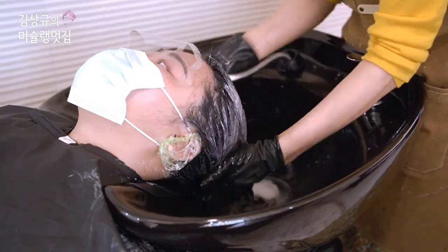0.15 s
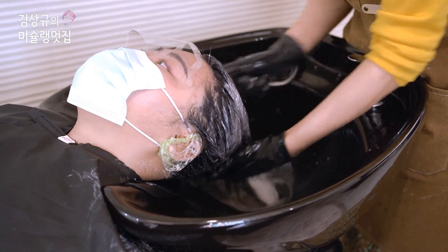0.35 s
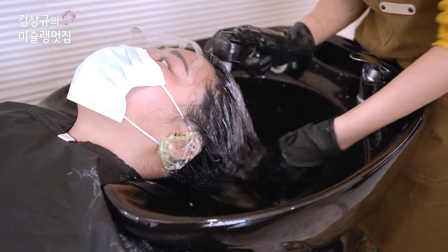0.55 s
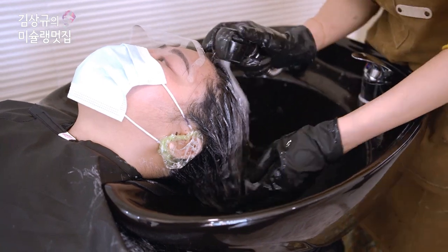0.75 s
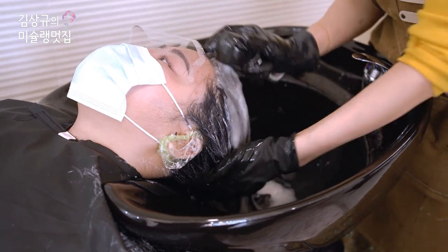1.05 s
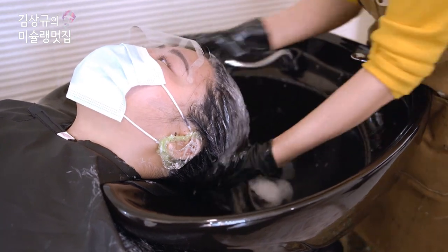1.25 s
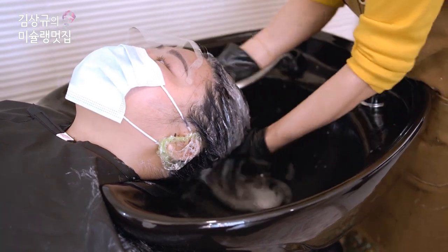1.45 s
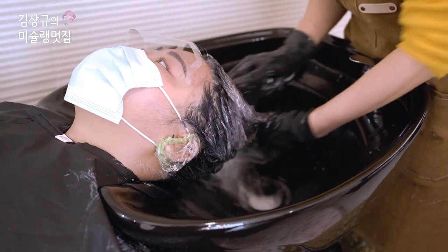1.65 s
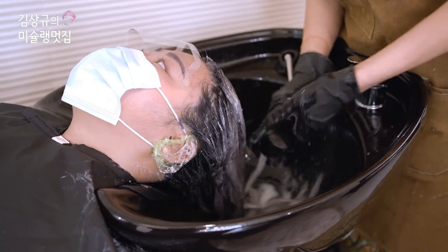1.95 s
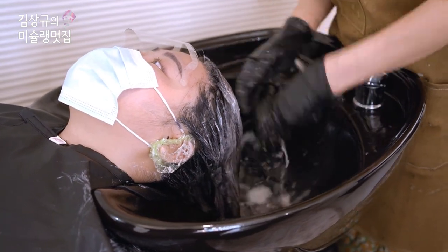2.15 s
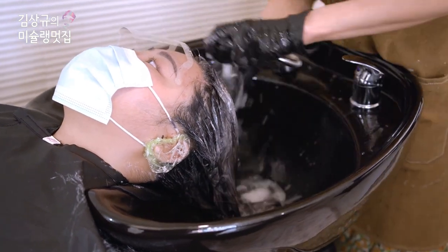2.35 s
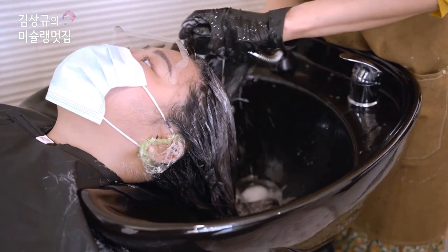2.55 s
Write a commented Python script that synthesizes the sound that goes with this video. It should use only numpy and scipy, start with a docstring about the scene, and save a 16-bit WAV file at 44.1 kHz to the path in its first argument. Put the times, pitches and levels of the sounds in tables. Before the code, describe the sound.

Water sprays steadily onto wet hair, spattering and sloshing into a salon basin.

```python
"""At a salon basin, a hand shower rinses hair. Fine drops hiss on the hair, and coarser ones spatter
when the jet sweeps over glove and basin. Pockets between the cupped hand and the wet hair squelch as
they fill and open. Shed water slaps into the bowl, which rings faintly, and air gulps in the drain."""
import sys
import numpy as np
from scipy import signal
from scipy.fft import rfft, irfft
from scipy.io import wavfile
from scipy.ndimage import uniform_filter1d

SR = 44100
rng = np.random.default_rng(int(sys.argv[2]) if len(sys.argv) > 2 else 0)


def digitize_waveform(pressure):
    """Quantize a signal to 16-bit integers and store it at the path in sys.argv[1].

    Rows of a 2-D input are taken as channels; values are limited to [-1, 1].
    """
    field = np.atleast_2d(pressure).T
    bounded = np.clip(field, -1, 1)
    quanta = np.round(bounded * 32767).astype(np.int16)
    wavfile.write(sys.argv[1], SR, quanta)


N = 119070
T = np.arange(N) / SR
HZ = np.maximum(np.arange(N // 2 + 1) * SR / N, 1)


def from_db(db):
    """Turn decibels into a number to multiply by."""
    return 10 ** (np.asarray(db) / 20)


def unit_power(x):
    """Scale a sound to an average power of 1."""
    return x / np.sqrt(np.mean(x ** 2) + 1e-20)


def at_hz(points):
    """Read a table of (Hz, value) at every frequency."""
    hz, value = np.transpose(points)
    return np.interp(np.log(HZ), np.log(hz), value)


def in_time(points):
    """Read a table of (seconds, value) at every sample."""
    return np.interp(T, *np.transpose(points))


def filtered(x, gain):
    """Turn each frequency up or down by its own gain."""
    return irfft(rfft(x) * gain, N)


def low_cut_db(hz):
    """Fade out the tones below hz: small things give off little bass."""
    return -10 * np.log10(1 + (hz / HZ) ** 6)


def delayed(x, ms):
    """Delay both sides by a time that may keep changing."""
    return np.array([np.interp(T - ms / 1000, T, side) for side in x])


def drift(hz):
    """A random wobble of about size 1, mostly slower than hz."""
    return unit_power(filtered(rng.standard_normal(N), 1 / (1 + (HZ / hz) ** 2)))


def swell(peak_s, rise_s, fall_s):
    """A rounded rise to 1, then a fading tail."""
    rise = np.minimum(T - peak_s, 0) / rise_s
    fall = np.clip((T - peak_s) / fall_s, 0, 40)
    return np.exp(-rise ** 2 - fall)


def ring(clicks, hz, fade_s):
    """Each click starts a tone that fades by 60 dB in fade_s."""
    decay, angle = from_db(-60 / (fade_s * SR)), 2 * np.pi * hz / SR
    feedback = [1, -2 * decay * np.cos(angle), decay ** 2]
    return signal.lfilter([0, decay * np.sin(angle)], feedback, clicks + 1e-18)


def drops(per_s, spread_db):
    """Three streams of random clicks of uneven size: one shared, one for each side."""
    sizes = from_db(spread_db * np.minimum(rng.exponential(1, (3, N)), 5))
    signs = rng.choice([-1, 1], (3, N))
    return unit_power(sizes * signs * (rng.random((3, N)) < per_s / SR))


# How alike the two sides sound. Each row: frequency in Hz, likeness (1 or more means the same).
LIKENESS = [(150, 1.23), (500, 0.73), (1400, 0.73), (2800, 0.43), (5600, 0.34), (12000, 0.14)]

def stereo(streams, colour_db=0):
    """Colour three streams and mix them to left and right, alike in the bass but not in the treble."""
    alike, gain = np.clip(at_hz(LIKENESS), 0, 1), from_db(colour_db)
    shared = filtered(streams[0], gain * np.sqrt(alike))
    sides = filtered(streams[1:], gain * np.sqrt(1 - alike))
    return unit_power(shared + sides)


# The flow down the bowl. Each row: time in seconds, level in dB.
RUNOFF_LEVEL = [(0, -57), (.15, -56), (.24, -61), (.45, -61), (.7, -58.5), (.93, -63), (1.08, -58),
                (1.26, -54), (1.34, -54), (1.55, -59.5), (1.85, -58.5), (1.94, -62), (2.05, -54),
                (2.2, -64), (2.7, -56.5)]
# Its tone colour. Each row: frequency in Hz, level in dB.
RUNOFF_COLOUR = [(30, -50), (65, -32), (105, -17), (160, -2.5), (250, 1.5), (315, 4), (390, -1), (600, 4),
                 (1000, -3), (2500, -10.5), (8000, -12.5), (16000, -40)]

def runoff():
    """Water runs down the bowl with a low, uneven trickle."""
    level = from_db(in_time(RUNOFF_LEVEL) + 1.05 * drift(36))
    return level * stereo(drops(per_s=2000, spread_db=2.6), at_hz(RUNOFF_COLOUR))


# The tones in one smack. Each row: multiple of its pitch, level in dB.
SMACK_TONES = [(.66, -4), (1, -2), (1.33, 0)]

def smack(hz, cycles):
    """Water lands with a short, dead ring: small drops sound high, large lumps low."""
    click = signal.unit_impulse(SR // 20)
    tones = sum(from_db(db) * ring(click, ratio * hz, cycles / hz) for ratio, db in SMACK_TONES)
    band = signal.butter(2, [hz / 2, hz * 1.4], "band", fs=SR, output="sos")
    hit = signal.sosfilt(band, tones)
    return hit / np.abs(hit).max()


# Water landing. Each row: start in seconds, level in dB, pitch in Hz, length of the ring in cycles.
SLAPS = [(.030, -35, 2400, 10), (.0885, -28, 2200, 14), (.2864, -23, 7400, 20), (.2918, -20, 7800, 26),
         (.7278, -28, 1800, 16), (1.1818, -27, 8000, 14), (1.9482, -20, 3100, 12),
         (1.9522, -11.5, 2900, 18), (1.9572, -20, 4600, 10), (1.9581, -16, 2900, 12),
         (1.9605, -11, 3300, 15), (2.2848, -20, 5700, 20), (2.2978, -17, 6000, 26), (2.309, -18, 3400, 16),
         (2.3124, -17, 4400, 22), (2.321, -18, 4000, 18), (2.4935, -24, 3500, 16)]

def slaps(echo_db=-7.5, echo_fade_s=0.17):
    """Lumps of water and heavy drops smack down, and the sound scatters round the bowl."""
    hits = np.zeros(N + SR)
    for start_s, db, hz, cycles in SLAPS:
        hit, at = from_db(db) * smack(hz, cycles), int(start_s * SR)
        hits[at:at + len(hit)] += hit
    scatter = rng.standard_normal((2, N)) * from_db(-60 * np.minimum(T / echo_fade_s, 3))
    scatter /= np.linalg.norm(scatter, axis=1, keepdims=True)
    echo = signal.fftconvolve(hits[None, :N], scatter)[:, :N]
    return hits[:N] + from_db(echo_db) * echo


# The spray, which dips while the hand covers it. Each row: time in seconds, level in dB.
SPRAY_LEVEL = [(.07, -36.5), (.17, -35.5), (.33, -35.5), (.52, -37.5), (.75, -34.5), (.95, -35.5),
               (1.03, -35), (1.22, -34), (1.38, -37.5), (1.47, -42.5), (1.51, -47), (1.548, -47),
               (1.575, -37), (1.72, -36), (1.85, -36.5), (2.15, -35), (2.44, -36), (2.7, -37)]
# Its tone colour. Each row: frequency in Hz, level in dB.
SPRAY_COLOUR = [(250, -55), (450, -19), (750, -16), (1000, -10), (1330, -6), (1680, -1.5), (2300, -1),
                (3100, -2), (4000, -1), (5500, -2.5), (8000, -2), (10000, -5), (12500, -6.5), (15500, -9)]
# How its treble dulls and returns. Each row: time in seconds, change in dB.
SPRAY_TREBLE = [(.1, 0), (.7, -1.5), (1.05, -4), (1.33, -3.5), (1.5, -2), (1.62, -5.5), (1.9, 0),
                (2.2, -1.5), (2.7, -1.5)]

def spray(start_s=0.066, attack_s=0.0024, mist_db=5.5, flutter_db=0.97, bubble_db=-22.5, tick_db=-12):
    """Fine drops and smooth mist hiss on the hair; bubbles and ticks rise and sink with them."""
    grains = drops(per_s=5000, spread_db=3) + from_db(mist_db) * rng.standard_normal((3, N))
    hiss = stereo(grains, at_hz(SPRAY_COLOUR) + low_cut_db(660))
    treble = filtered(hiss, from_db(low_cut_db(6300)))
    hiss += (from_db(in_time(SPRAY_TREBLE)) - 1) * treble
    opening = np.clip((T - start_s) / attack_s, 0, 1)
    level = opening * from_db(in_time(SPRAY_LEVEL) + flutter_db * drift(40))
    return level * (hiss + from_db(bubble_db) * bubbles() + from_db(tick_db) * ticks())


def bubbles(pitches=48, cycles=21):
    """Small bubbles ring briefly in the wet hair."""
    clicks, choice = drops(per_s=290, spread_db=3.5), rng.integers(0, pitches, N)
    rings = sum(np.sqrt(hz) * ring(clicks * (choice == k), hz, cycles / hz)
                for k, hz in enumerate(np.geomspace(1450, 7000, pitches)))
    return stereo(rings, low_cut_db(630))


def ticks(pitches=10, cycles=14):
    """Stray droplets tick on the glaze, each at a pitch picked by chance."""
    clicks, choice = drops(per_s=70, spread_db=2), rng.integers(0, pitches, N)
    rings = sum(signal.fftconvolve(clicks * (choice == k), smack(hz, cycles)[None])[:, :N]
                for k, hz in enumerate(np.geomspace(4000, 11000, pitches)))
    return stereo(rings)


# Close echoes off bowl and hands. Each row: delay in milliseconds, level in dB.
REFLECTIONS = [(1.3, -18.5), (2.1, -19.5), (3.2, -16), (4.4, -27), (5.9, -11.5), (7.7, -11), (10.3, -13)]

def reflections(x, wander_ms=0.25, wander_hz=1.3):
    """Echo paths wander as the sprayer moves, giving the hiss a shifting, hollow colour."""
    echoes = sum(from_db(db) * delayed(x, ms + wander_ms * drift(wander_hz)) for ms, db in REFLECTIONS)
    return (x + echoes) / np.sqrt(1 + sum(from_db(db) ** 2 for _, db in REFLECTIONS))


# The basin's own tones. Each row: pitch in Hz, relative level in dB.
BOWL_TONES = [(973, -5), (1421, -2), (1653, -8), (1815, -9), (1941, -5), (2200, -2), (2414, -6), (2556, -6),
              (2795, -6), (2922, -6), (3304, -5), (4187, -6), (6009, -7), (9626, -4)]

def bowl(x, width_hz=22, ring_db=-3):
    """The hollow of the basin rings along, lifting a few narrow tones."""
    rings = sum(from_db(db) / (1 + 2j * (HZ - hz) / width_hz) for hz, db in BOWL_TONES)
    return filtered(x, 1 + from_db(ring_db) * rings)


def churn():
    """The jet stirs trapped water into a dense crackle."""
    return stereo(drops(per_s=4100, spread_db=4))


# Water pockets under the hand. Each row: peak time, rise and fall in seconds, level in dB,
# pitch in Hz, glide in octaves per second, width in octaves, left minus right in dB.
SQUELCHES = [(.09, .006, 0.023, -39, 1800, -12, 0.54, -1), (.24, 0.041, 0.048, -32.5, 2080, -4, .7, 2),
             (.732, 0.0054, 0.017, -43.5, 1410, 2, 1.7, 0), (1.245, 0.0081, 0.027, -38, 1940, 26, 0.48, 1),
             (1.283, 0.0033, 0.029, -47, 560, -8, 0.73, -4), (1.465, .008, 0.048, -52.5, 1200, -6, 1.7, -2),
             (1.6, .028, 0.088, -39.5, 1213, 4.5, 0.32, 1.5),
             (1.614, 0.035, 0.029, -41, 1940, -11, 0.33, -2.5),
             (1.685, 0.062, 0.09, -38, 2100, 6.5, 0.68, 0), (1.675, 0.027, 0.048, -42, 8100, 1, 0.081, -1),
             (1.894, 0.019, 0.012, -39, 1730, -3, 0.93, 1), (1.965, 0.018, 0.06, -48, 720, 13, .34, -2),
             (2.224, .007, .018, -35.5, 2255, 2, .22, 0), (2.24, .013, .016, -33.5, 3200, 4, .55, -1.5),
             (2.258, .003, .007, -30.5, 4200, 20, .55, 0), (2.41, 0.053, 0.028, -43.5, 1700, 0, 0.31, -1)]

def squelches(bands=24):
    """The jet churns in pockets, each with a broad pitch that glides as it changes size."""
    spectrum = rfft(churn())
    edges, times = np.geomspace(340, 10000, bands + 1), T[::32]
    centres = np.sqrt(edges[1:] * edges[:-1])[:, None]
    power = np.zeros((2, bands, len(times)))
    # Share each pocket's power among the frequency bands near its pitch.
    for peak_s, rise_s, fall_s, db, hz, glide, width, pan_db in SQUELCHES:
        octaves_away = np.log2(centres / hz) - glide * np.clip(times - peak_s, -rise_s * 2, fall_s * 2)
        share = 1 / (1 + (octaves_away / width) ** 4) ** 3
        level = from_db(db) * np.interp(times, T, swell(peak_s, rise_s, fall_s))
        pan = from_db([pan_db, -pan_db])[:, None, None]
        power += pan * share / share.sum(axis=0) * level ** 2
    out = 0
    for k in range(bands):
        band = unit_power(irfft(spectrum * ((HZ >= edges[k]) & (HZ < edges[k + 1])), N))
        out += band * np.sqrt([np.interp(T, times, side) for side in power[:, k]])
    return out


# The gap between hand and hair. Each row: time in seconds, the sound's round trip in milliseconds.
GAP_TRIP = [(.18, 0.56), (.195, 0.8), (.21, 0.78), (.3, 1.16), (1.6, 1.01), (1.75, 0.43), (2.7, 0.42)]

def hand_gap(x, bounce_gain=0.28):
    """Sound bounces between hand and hair; its colour sinks as the gap opens and rises as it closes."""
    return sum(bounce_gain ** k * delayed(x, k * in_time(GAP_TRIP)) for k in range(3))


# The cupped hand floods and opens. Each row: time in seconds, level in dB, lowest tone in Hz,
# upper limit in Hz above which tones fade.
SURGES = [(.176, -48, 3100, 4800), (.186, -32, 2300, 4400), (.195, -27, 1330, 4400),
          (.208, -23.5, 1060, 4600), (.216, -26, 1020, 3100), (.224, -21.5, 980, 2900),
          (.228, -30, 960, 2800), (.231, -22, 950, 2800), (.239, -18.5, 980, 2300), (.243, -26, 960, 2600),
          (.251, -23, 970, 2700), (.26, -33, 960, 2700), (.272, -32, 950, 2500), (.29, -48, 950, 2500)]
# The tones of that hollow. Each row: multiple of the lowest tone, level in dB.
HAND_TONES = [(1, -7), (1.58, -.5), (2.05, 2), (2.6, .5), (3.05, -1), (3.95, 1)]

def cupped_hand(width_hz=240):
    """The jet floods the cupped hand in surges; the hollow's tones plunge together as it opens."""
    water, tones = churn(), 0
    db, lowest_hz, top_hz = (in_time([(row[0], row[k]) for row in SURGES]) for k in (1, 2, 3))
    decay = np.exp(-np.pi * width_hz / SR)
    for ratio, tone_db in HAND_TONES:
        hz = ratio * lowest_hz
        # A gliding filter: shift this pitch down to 0 Hz, smooth, then shift it back.
        shift = np.exp(2j * np.pi * np.cumsum(hz) / SR)
        tone = signal.lfilter([(1 - decay) ** 2], [1, -2 * decay, decay ** 2], water / shift) * shift
        tones += from_db(tone_db) / np.sqrt(1 + (hz / top_hz) ** 14) * tone.real
    power = uniform_filter1d(np.mean(tones ** 2, axis=0), size=300)
    steady = tones / np.sqrt(power + 1e-20)
    flooding = (T > SURGES[0][0]) * (T < SURGES[-1][0])
    return filtered(from_db(db) * flooding * steady, from_db(2 * low_cut_db(930)))


# The jet sweeps over glove and basin. Each row: peak time, rise and fall in seconds, level in dB,
# brightness in dB per octave.
SWEEPS = [(.292, 0.0073, 0.016, -34.5, 19), (0.984, 0.022, 0.14, -34, 5.5), (1.186, 0.0078, 0.009, -38, 12),
          (1.366, 0.0095, 0.039, -38.5, 2.5), (1.412, 0.0094, 0.031, -37, 11),
          (1.892, 0.018, 0.012, -37, 0), (1.973, 0.021, 0.027, -26.5, -0.5), (1.999, 0.02, 0.012, -27, 19),
          (2.025, 0.021, 0.031, -27.5, 5), (2.051, 0.009, 0.042, -29.5, 8.5),
          (2.205, .038, 0.091, -34, 7.5), (2.295, 0.0097, .02, -29.5, 6.5), (2.318, 0.018, 0.1, -29, 5.5),
          (2.492, 0.0083, 0.09, -34, 5)]
# The spatter's tone colour. Each row: frequency in Hz, level in dB.
SPATTER_COLOUR = [(290, -67), (500, -35), (569, -28), (783, -28), (866, -30), (1940, 2), (4300, 5),
                  (8370, -2.5), (15800, -15.5)]

def spatters():
    """Coarser drops hit hard, wet surfaces, each sweep with its own brightness."""
    patter = stereo(drops(per_s=4700, spread_db=2), at_hz(SPATTER_COLOUR) + low_cut_db(550))
    out = 0
    for peak_s, rise_s, fall_s, db, tilt_db in SWEEPS:
        brightness = from_db(tilt_db * np.log2(np.minimum(HZ, 9000)))
        sweep = filtered(np.roll(patter, rng.integers(N), axis=1), brightness)
        out += from_db(db) * swell(peak_s, rise_s, fall_s) * unit_power(sweep)
    return out


# Air in the drain. Each row: start in seconds, relative level in dB, starting pitch in Hz,
# seconds to fade by 60 dB, seconds to swell.
GULPS = [(.994, -41, 197, 0.076, 0.013), (1.163, -48.5, 170, 0.096, 0.0077), (1.279, -48, 492, .075, .002),
         (1.279, -48.5, 297, 0.15, 0.0024), (1.286, -45, 690, 0.021, 0.0025),
         (1.28, -52.5, 153, 0.11, 0.0027), (1.295, -43, 288, .09, 0.006),
         (1.321, -37.5, 307, 0.068, 0.0092), (2.023, -44.5, 256, 0.073, 0.012),
         (2.042, -50.5, 182, 0.12, .013)]

def drain_gulps(rise_per_s=1.37, rough_db=1.5, wobble_radians=0.75, wobble_hz=63):
    """Large bubbles gulp in the drain, wobbling and rising in pitch."""
    roughness = from_db(rough_db * drift(wobble_hz))
    wobble = wobble_radians * drift(wobble_hz)
    out = 0
    for start_s, db, hz, fade_s, attack_s in GULPS:
        age = np.clip(T - start_s, 0, 1)
        level = (1 - np.exp(-(age / attack_s) ** 2)) * from_db(db - 60 * age / fade_s)
        phase = 2 * np.pi * hz * (age + rise_per_s * age ** 2 / 2)
        out += 2 * level * np.sin(phase + wobble)
    return filtered(roughness * out, from_db(2 * low_cut_db(117)))


# The balance of the two sides. Each row: frequency in Hz, left minus right in dB.
BALANCE = [(60, 0.5), (120, 0.0), (240, 1.1), (480, -0.7), (950, -0.4), (1890, -2), (3770, 0.59),
           (7520, -2.5), (15000, -2.0)]

def scene():
    """All the water in the bowl, a little to the right."""
    jet = spray() + spatters() + hand_gap(squelches())
    water = bowl(reflections(jet)) + cupped_hand() + slaps() + runoff() + drain_gulps()
    return filtered(water, from_db(at_hz(BALANCE) * np.array([[.5], [-.5]])))


def record(dry):
    """Cut the treble steeply above 15800 Hz."""
    return signal.sosfilt(signal.ellip(12, .1, 80, 15800, fs=SR, output="sos"), dry)


dry = scene()
out = record(dry)
digitize_waveform(out)
```